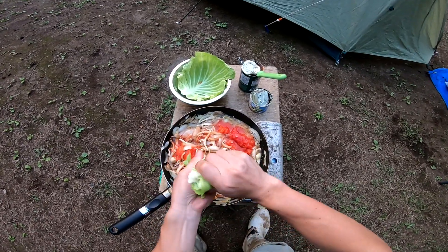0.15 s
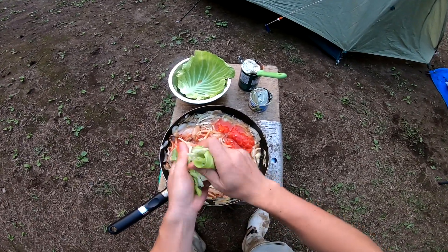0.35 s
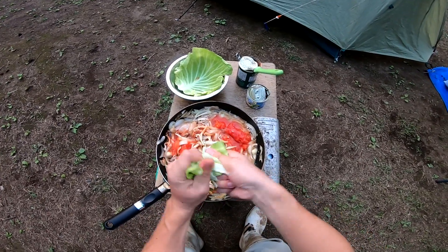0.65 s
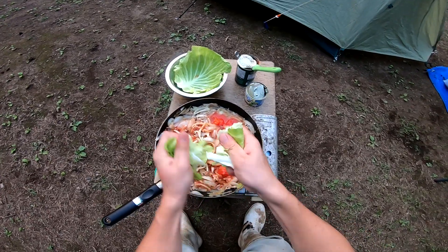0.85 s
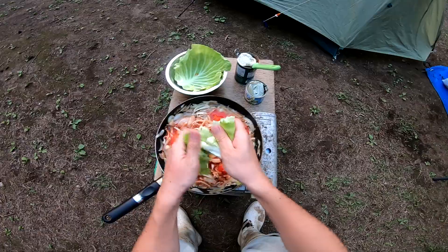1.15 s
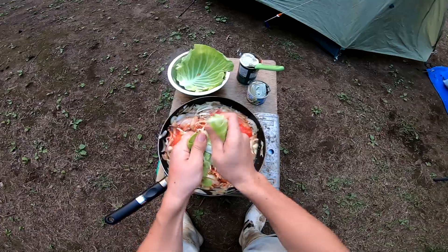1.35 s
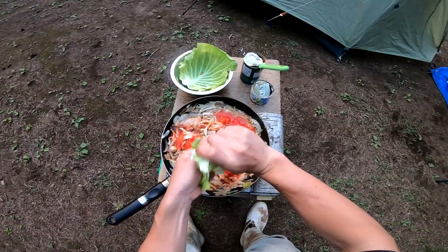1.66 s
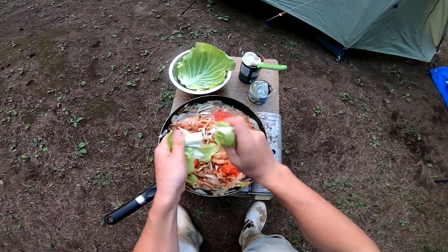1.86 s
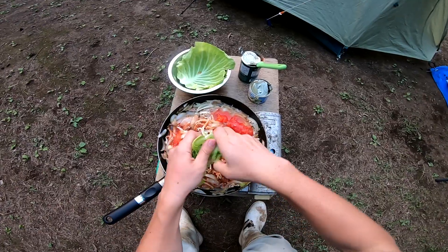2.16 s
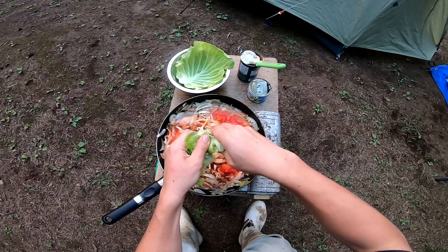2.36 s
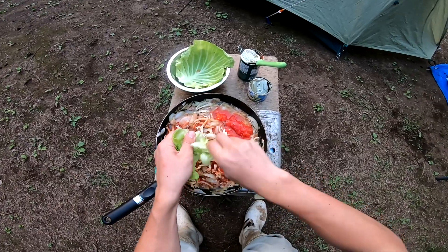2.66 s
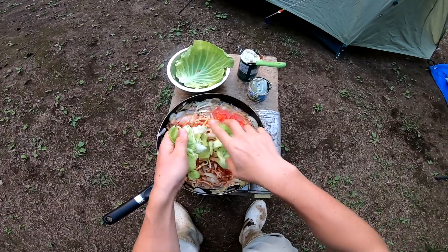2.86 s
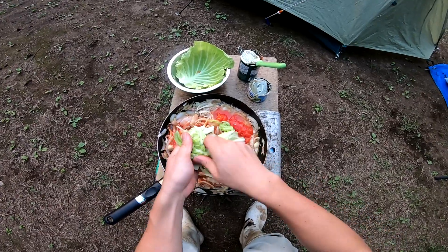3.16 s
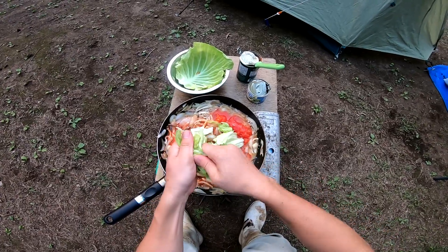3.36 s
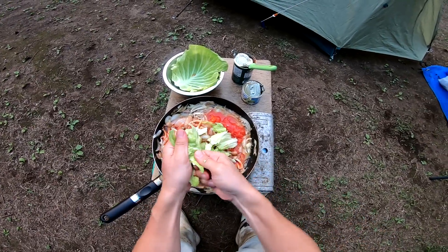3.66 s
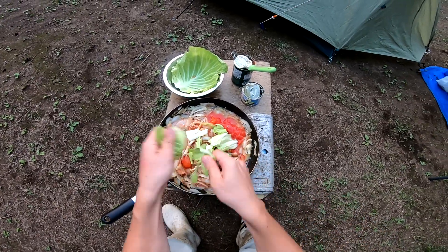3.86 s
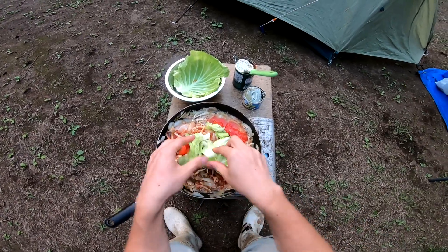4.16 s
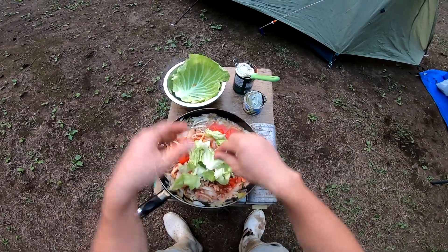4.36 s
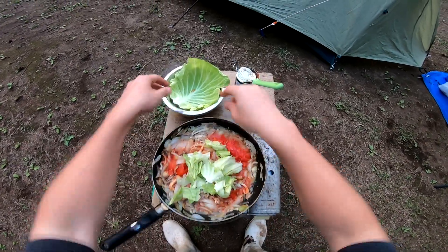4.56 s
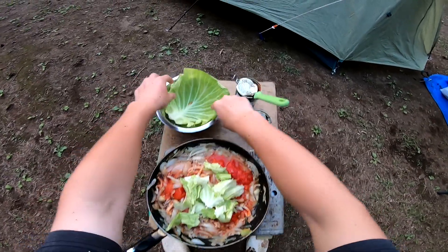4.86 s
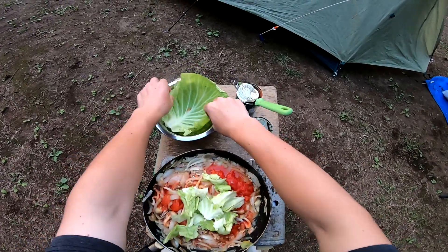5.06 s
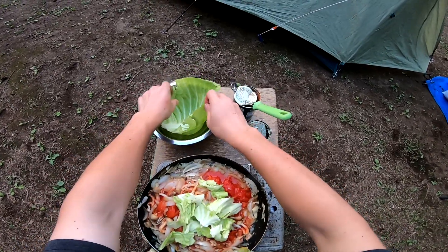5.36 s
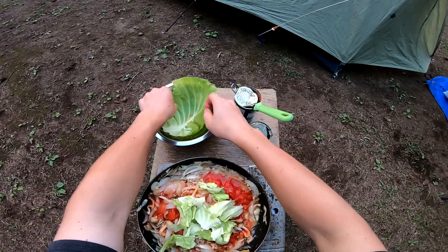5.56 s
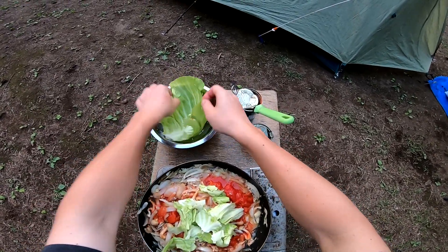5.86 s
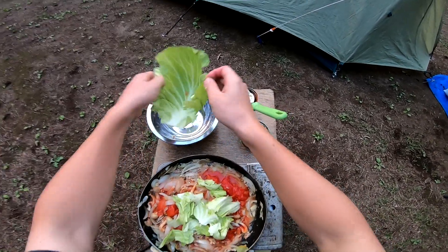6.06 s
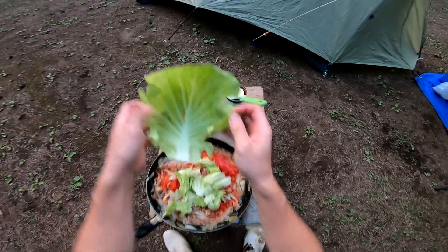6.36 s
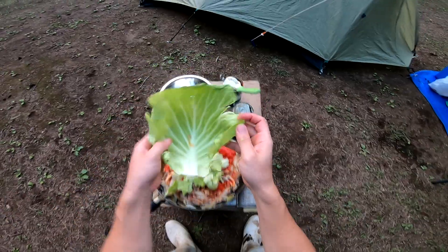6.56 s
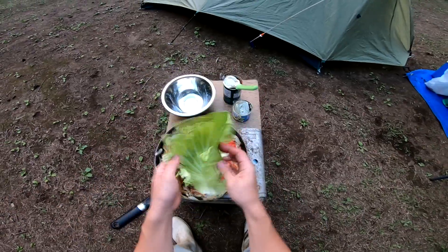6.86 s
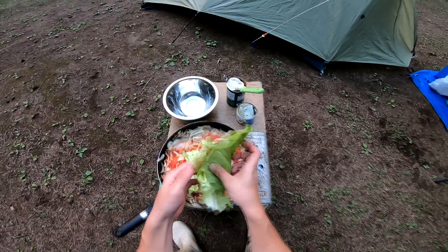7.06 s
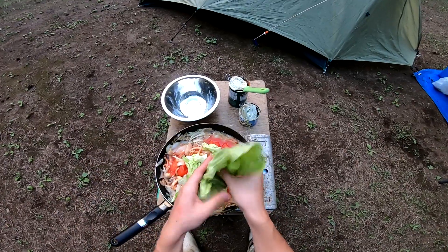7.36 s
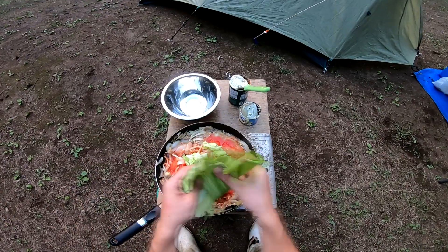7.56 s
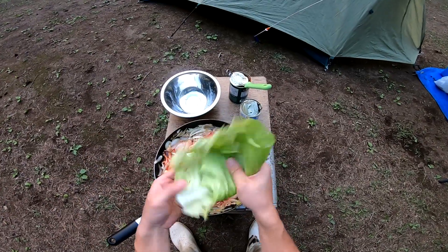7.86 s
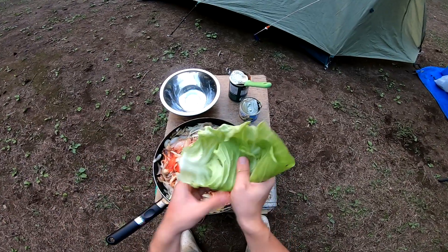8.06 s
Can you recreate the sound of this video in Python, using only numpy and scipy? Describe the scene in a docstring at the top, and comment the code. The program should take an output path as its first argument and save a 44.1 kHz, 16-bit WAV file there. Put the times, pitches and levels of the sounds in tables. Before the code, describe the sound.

Crisp cabbage leaves snap and tear by hand in short bursts over a steady throbbing cicada chorus, then a metal bowl knocks on wood.

```python
"""Leaf ribs snap and fibres crackle as two hands tear cabbage leaves: noise bursts ringing resonances.
Around them cicadas throb, as noise gated by drum clicks, and one cricket chirps, as pulsed narrow-band noise.
A leaf is pulled from a steel bowl that rings and rocks on a wooden board: decaying sine modes under contact noise.
Light wind buffets the microphone ports over a quiet rustle of the woods: slowly varying filtered noise."""
import sys
import numpy as np
from scipy import signal
from scipy.fft import rfft, irfft, next_fast_len
from scipy.io import wavfile
from scipy.ndimage import uniform_filter1d, map_coordinates

SR = 44100
rng = np.random.default_rng(int(sys.argv[2]) if len(sys.argv) > 2 else 0)


def inscribe(sig):
    """Save sig as 16-bit PCM at rate SR to the path in sys.argv[1].

    A 1-D sig is mono; a 2-D sig holds one channel per row.
    Samples are clipped to [-1, 1] before scaling.
    """
    pcm = np.round(np.clip(np.atleast_2d(sig).T, -1, 1) * 32767)
    wavfile.write(sys.argv[1], SR, pcm.astype(np.int16))


N = 362061

# Rib snaps: t/s, peak level/dB, leaf ring f/Hz, hollow of the hands re snap peak/dB
RIB_SNAPS = [(0.0058, -20.5, 3400, -24), (0.0141, -16, 3440, -21), (0.069, -19, 3300, -30),
             (0.079, -17, 3200, -19), (0.096, -19, 1960, -27), (0.127, -13, 3750, -32),
             (0.1556, -15, 4430, -25), (0.164, -12.5, 3140, -32), (0.2171, -23, 2730, -21),
             (0.491, -22, 3560, -23), (0.569, -20, 3450, -19), (0.5784, -10.5, 3200, -20),
             (0.608, -11, 4600, -35), (0.6278, -21, 4350, -23), (0.6514, -23.5, 3500, -14),
             (0.679, -17.5, 4260, -30), (0.695, -17.5, 3100, -20), (0.7027, -17, 4700, -28),
             (0.713, -25, 3300, -12), (0.736, -19, 2700, -29), (1.306, -28.5, 2840, -18),
             (1.3148, -22, 3350, -25), (1.3506, -13.5, 4470, -30), (1.435, -15, 3350, -28),
             (1.464, -24, 3550, -14), (1.48, -24, 3700, -28), (1.497, -30, 3000, -27),
             (1.5287, -5, 3500, -23), (1.564, -18.5, 1600, -32), (1.594, -28.5, 1690, -17),
             (1.6687, -22.5, 3540, -23), (1.7436, -28.5, 1870, -25), (1.7727, -25, 1850, -25),
             (2.357, -18, 3770, -22), (2.367, -23, 3810, -18), (2.3916, -19.5, 3820, -24),
             (2.413, -24, 3640, -25), (2.458, -20, 3730, -33), (2.498, -21, 3750, -26),
             (2.5286, -17.5, 3490, -20), (2.5435, -26, 4220, -15), (2.558, -23, 3300, -16),
             (2.6213, -21.5, 3510, -16.5), (3.2245, -22.5, 3040, -26), (3.2488, -20, 3600, -18),
             (3.2778, -16.5, 3800, -27), (3.2956, -28, 2000, -20), (3.3173, -16, 3300, -29),
             (3.324, -21.5, 2950, -20), (3.4192, -18, 3620, -20), (3.4288, -11.5, 4830, -24),
             (3.474, -19, 3870, -29), (3.503, -31, 2000, -25), (3.5227, -14.5, 3760, -17.5),
             (3.568, -16.5, 3500, -26), (3.588, -20, 4370, -32), (3.6025, -18, 4120, -30),
             (3.606, -26, 3330, -25), (3.67, -30, 2100, -26), (3.69, -24, 4460, -32),
             (3.731, -20, 2970, -30), (3.7373, -13, 4080, -38), (3.7437, -17.5, 2900, -14),
             (5.759, -24.5, 2480, -36), (7.0137, -26, 1130, -8), (7.1915, -26, 2490, -12),
             (7.296, -23.5, 3320, -12), (7.3538, -23, 1040, -9.5), (7.4736, -27.5, 1830, -8.5),
             (7.593, -25.5, 2200, -10), (7.844, -26.5, 1770, -2), (7.8869, -30, 1640, 2),
             (7.907, -19.5, 1770, -9.5), (7.966, -24, 3020, -6), (7.9701, -19, 3160, -12),
             (8.027, -24, 1720, -7.5), (8.116, -27.5, 2870, -24), (8.1405, -29, 1880, -19),
             (8.165, -22.5, 4590, -11.5), (8.1704, -23.5, 1790, -18)]
# Whole leaves buckling: t/s, level/dB, f/Hz
LEAF_POPS = [(2.085, -37.5, 955), (4.99, -44, 2450), (6.165, -40.5, 2190), (6.799, -38, 1010),
             (6.8, -38, 1880), (6.842, -37.5, 910), (7.118, -32.5, 1320), (7.134, -39, 1084),
             (7.172, -35, 1090), (7.57, -37, 1080), (7.632, -34, 880), (7.683, -36, 1050),
             (7.788, -42, 708), (8.057, -39, 1700)]
# Pulls that rip a leaf: t/s, length/s, crackle level/dB
RIP_STROKES = [(0.0, 0.26, -50.5), (.2, 0.23, -55.5), (.42, 0.21, -47.5), (.62, 0.12, -45.5),
               (.73, 0.06, -50.5), (.8, 0.058, -40.5), (1.29, 0.34, -51.5), (1.73, 0.063, -47.5),
               (1.6, 0.13, -59), (2.28, 0.059, -52.5), (2.33, .1, -47.5), (2.43, 0.19, -49.5),
               (3.2, 0.13, -44), (3.16, .63, -54.5), (3.38, 0.054, -46.5), (3.53, 0.091, -46.5),
               (3.68, 0.072, -47), (7.0, 0.36, -59), (7.46, 0.62, -58.5)]
# Leaf sliding through the hands: t/s, length/s, rub level/dB
SLIDE_STROKES = [(.57, 0.058, -57.5), (.8, 0.059, -52.5), (6.96, 0.12, -52.5), (7.1, 0.1, -59),
                 (7.24, 0.08, -53), (7.5, 0.124, -51), (7.6, 0.159, -45.5), (7.74, 0.187, -47),
                 (7.95, 0.22, -52.5)]
# Fibre crackle, common colour: f/Hz, relative level/dB
CRACKLE_SPECTRUM = [(500, -37), (1000, -2.5), (1400, -11.5), (1800, 1.5), (2300, -1), (2900, 5.5),
                    (3600, 6.5), (4200, 7.5), (5500, 2), (7500, 13.5), (10000, 11), (13000, -30)]
# Leaf rubbing on fingers: f/Hz, relative density/dB
RUB_SPECTRUM = [(100, -40), (150, 1.5), (200, 2), (330, -5), (600, -6), (800, 1), (1150, 1), (1400, -6.5),
                (1800, -1.5), (2400, -24.5)]

# Nails on the bowl's rim: t/s, level/dB
RIM_TAPS = [(5.038, -44), (5.357, -44)]
# Steel bowl modes: f/Hz, mean level/dB, t60/s
BOWL_MODES = [(1292, -12, .4), (1350, -6, .4), (1416, -2, .15), (1593, -11, .5), (2073, -10, .6),
              (2444, -4, .55), (2705, -3, .22), (3020, 0, .3), (3644, -8, .1)]
# Bowl's foot on the board: t/s, level/dB
BOARD_KNOCKS = [(5.043, -51), (5.062, -49), (5.162, -44), (5.199, -41.5), (5.343, -34.5), (5.389, -42),
                (5.443, -27), (5.478, -33), (5.499, -41), (5.613, -31), (5.628, -32.5), (5.649, -32.5),
                (5.687, -45)]
# Wooden board modes: f/Hz, mean level/dB, t60/s
BOARD_MODES = [(165, -9, 0.11), (216, 0.5, 0.066), (272.4, -6, 0.14), (434, -13, 0.093), (606, -9, 0.041),
               (990, -15, 0.038)]
# Wet leaf on steel: t/s, length/s, start f/Hz, end f/Hz, peak level/dB
LEAF_SQUEAKS = [(5.137, 0.012, 3800, 3500, -27), (5.149, 0.0065, 3350, 3180, -33),
                (6.312, .008, 3520, 3430, -39)]

# Pumping of cicada bodies, one row: rate/Hz, share of a throb gone at the start
LOW_PUMP = (10.62, 0)
HIGH_PUMP = (10.8, .2)
# Cicada groups: t/s, low level/dB, high level/dB, overtone level/dB, far level/dB
CHORUS_LEVELS = [(0.0, -35.5, -43.5, -63, -55.5), (4.64, -36, -42.5, -62.5, -53),
                 (8.21, -36, -41, -62.5, -54)]
# Cicada songs: f/Hz, relative density/dB
LOW_SPECTRUM = [(3900, -33.5), (4500, -12.5), (5100, -3.5), (5400, -2), (5620, 0.5), (5850, -1.5),
                (6100, -3.5), (6700, -6.5), (7300, -19), (8000, -54)]
HIGH_SPECTRUM = [(5600, -66), (6300, -1.5), (7000, 4), (7700, 1), (8250, -6.5), (8800, -22), (9500, -60)]
OVERTONE_SPECTRUM = [(10500, -26), (12000, -1), (13100, 0), (14500, 4), (15600, -12), (17000, -7)]
FAR_SPECTRUM = [(7800, -33), (8600, 4), (9400, 0), (10200, -4.5), (11600, -5.5), (12500, -7.5),
                (14000, -40)]

# Cricket: t/s, level/dB
CRICKET_LEVEL = [(0, -75), (.9, -61), (2.5, -67), (4.2, -60), (5, -83), (8.21, -80)]
# Cricket voice: f/Hz, relative density/dB
CRICKET_SPECTRUM = [(8800, -60), (9150, -16), (9300, 15), (9450, -6), (9800, -50)]

# Far rustle of the woods: f/Hz, relative density/dB
RUSTLE_SPECTRUM = [(70, -82), (115, -7.5), (220, -5), (280, -4.5), (560, -5.5), (1190, -5), (1740, -8.5),
                   (2400, -5), (3300, -6.5), (4200, 0), (4800, 6.5), (5600, -42)]
# Rustle: t/s, level/dB
RUSTLE_LEVEL = [(0.0, -50), (1.42, -51.5), (8.21, -47.5)]
# Rustle: f/Hz, left-right correlation
RUSTLE_ALIKE = [(130, 0.86), (290, 0.75), (640, 0.5), (1400, 0.05), (3100, 0.59)]
# Rustle: f/Hz, left minus right/dB
RUSTLE_BALANCE = [(200, 1), (700, -2), (1300, -1.5), (2400, 0), (4400, 1.5)]
# Gusts: t/s, rumble level/dB, flutter level/dB
GUST_LEVELS = [(0.0, -57, -73), (0.2, -39.5, -41), (0.48, -62, -80), (0.66, -45.5, -55), (0.78, -59, -76),
               (1.46, -49, -59.5), (1.53, -40, -52), (1.96, -54.5, -66.5), (2.33, -37, -48),
               (2.54, -67, -90), (2.7, -59, -77), (4.21, -61.5, -78), (4.46, -48, -56), (4.64, -54.5, -77),
               (5.33, -72, -79), (5.69, -57, -64), (5.74, -67, -81), (5.97, -44, -55), (6.15, -67, -76),
               (6.29, -44.5, -39.5), (6.49, -56, -72), (6.63, -46, -52.5), (7.18, -60, -82),
               (7.75, -44, -47), (7.82, -59, -73), (8.21, -45.5, -57)]
# Wind noise: f/Hz, relative density/dB
RUMBLE_SPECTRUM = [(8, -24), (22, -3), (42, -4.5), (60, -14.5), (90, -49), (200, -120)]
FLUTTER_SPECTRUM = [(40, -26), (62, -6), (90, -6.5), (140, -15), (220, -21), (400, -49), (900, -120)]

BREAK_S, AFTER_GAIN = 0.0008, 0.09  # rib break: time constant, faint after-crackle
FORE_MEAN_S, FORE_MIN_DB = 0.004, -13  # a fainter copy of the snap, a few ms ahead of it
RISE_SHARE, LET_GO_S = 0.24, 0.01  # a stroke builds up over a share of its length, stops almost at once
LOW_DEPTH_DB, HIGH_DEPTH_DB, OVERTONE_DEPTH_DB = 1.5, 2.2, 3  # mean throb depths
DEPTH_WANDER = 0.4  # share of the throb depth
RUMBLE_LUMP_DB, FLUTTER_LUMP_DB = 2.5, 4.4  # small puffs inside each gust
LIMIT_DB, GRAB_S, RECOVER_DB_PER_S = -9, 0.0024, 180
BAND_LIMIT_HZ = 15750


def amp(db):
    """Gain of a level in dB."""
    return 10 ** (np.asarray(db) / 20)


def unit(x):
    """Scale to rms 1."""
    return x / np.sqrt(np.mean(x ** 2) + 1e-20)


def along(points, hz):
    """Interpolate (Hz, value) points on a log axis."""
    f, v = np.transpose(points)
    return np.interp(np.log(hz + 1), np.log(f + 1), v)


def curves(rows):
    """One value per sample for each column after the time."""
    s, *cols = np.transpose(rows)
    t = np.arange(N) / SR
    return np.array([np.interp(t, s, c) for c in cols])


def wobble(knots_per_s):
    """A smooth curve through random knots."""
    knots = rng.standard_normal(int(N * knots_per_s / SR) + 4)
    return map_coordinates(knots, [np.arange(N) * knots_per_s / SR])


def noise_pair():
    """Two unrelated white noises."""
    return rng.standard_normal((2, N))


def filtered(x, response):
    """Multiply the spectrum of x by a response of frequency."""
    m = next_fast_len(N + 8192)
    return irfft(rfft(x, m) * response(np.fft.rfftfreq(m, 1 / SR)), m)[..., :N]


def spread(pair, spectrum, alike, balance):
    """Two unrelated signals become a coloured stereo pair whose middle has rms 1."""
    def mid_side(hz):
        angle = np.arccos(np.clip(along(alike, hz), -1, 1)) / 2
        return amp(along(spectrum, hz)) * [np.cos(angle), np.sin(angle)]

    def left_right(hz):
        return amp(along(balance, hz) / 2 * np.array([[1], [-1]]))

    mid, side = filtered(pair, mid_side)
    out = filtered(np.array([mid + side, mid - side]), left_right)
    return out / np.std(out.mean(0))


def add(track, s, sound, pan_db):
    """Lay a sound into the stereo track; pan_db is left minus right."""
    part = track[:, round(s * SR):][:, :len(sound)]
    part += amp([[pan_db / 2], [-pan_db / 2]]) * sound[:part.shape[1]]


def peak_normalised(x):
    """Scale to peak 1."""
    return x / np.abs(x).max()


def snaps():
    """A rib's break burst rings the leaf and the hollow of the hands; whole leaves buckle with a pop."""
    track, t = np.zeros((2, N)), np.arange(1024) / SR
    f = np.fft.rfftfreq(len(t), 1 / SR)

    def resonance(centre_hz, width_hz):
        return 1j * f * width_hz / (centre_hz ** 2 - f * f + 1j * f * width_hz)

    body = (0.53 * resonance(4630, 6600) ** 3 + 0.59 * resonance(1800, 520) ** 2
            + 0.11 * resonance(9800, 4400) ** 2)
    # wet tissue radiates little treble
    damp = (resonance(8600, 11100) * 7500 / (1j * f + 1) * 7500 / 11000) ** 2
    hollow = resonance(975, 650) ** 2
    envelope = np.exp(-(t / BREAK_S) ** 2) + AFTER_GAIN * amp(-60 * t / 0.11)

    for s, db, hz, hollow_db in RIB_SNAPS:
        burst = rfft(rng.standard_normal(len(t)) * envelope)
        rib = resonance(hz, 0.2 * hz) * resonance(hz, hz)
        leaf = peak_normalised(irfft(burst * damp * (rib + body)))
        add(track, s, amp(db) * leaf, -2.5)
        fore_s = FORE_MEAN_S * rng.uniform(0.5, 1.5)
        fore_db = FORE_MIN_DB + rng.uniform(0, 3.3)
        add(track, max(s - fore_s, 0), amp(db + fore_db) * leaf, -2.5)
        add(track, s, amp(db + hollow_db) * peak_normalised(irfft(burst * hollow)), -5.5)

    for s, db, hz in LEAF_POPS:
        decay = amp(db - 60 * t / 0.023)
        attack = 1 - np.exp(-t / 0.00033)
        add(track, s, decay * attack * np.sin(2 * np.pi * hz * t), -5)
    return track


def strokes(rows):
    """Summed gain of hand strokes: build up, hold, let go."""
    t = np.arange(N) / SR
    gain = 0
    for s, length_s, db in rows:
        rise = (t - s) / (RISE_SHARE * length_s)
        fall = 1 + (s + length_s - t) / LET_GO_S
        gain = gain + amp(db) * np.clip(np.minimum(rise, fall), 0, 1)
    return gain


def tearing():
    """Small fibres part in clumps, some dull and some bright, and the leaf rubs along the fingers."""
    crackle = 0
    for centre_hz in (1800, 2900, 4200):
        chance = 260 / SR * amp(3 * wobble(40))
        starts = (rng.random(N) < chance) * amp(rng.uniform(-10, 0, N))
        fibres = uniform_filter1d(starts, size=26) * 32 + 0.1  # each lets go within 1 ms
        colour = [(hz, db - 9 * np.log2(hz / centre_hz) ** 2) for hz, db in CRACKLE_SPECTRUM]
        crackle = crackle + spread(fibres * noise_pair(), colour, [(1500, 0.6), (7000, 1.0)], [(1, -2.5)])
    rub_gain = amp(2.6 * wobble(90) + 2 * wobble(25))
    rub = spread(rub_gain * noise_pair(), RUB_SPECTRUM, [(1, 0.5)], [(1, -5)])
    return strokes(RIP_STROKES) * crackle + strokes(SLIDE_STROKES) * rub


def struck(blows, modes, attack_s, contact_gain, dull_s, pan_db):
    """Each blow rings the modes at new strengths, under a short burst of contact noise."""
    track, t = np.zeros((2, N)), np.arange(SR // 2) / SR
    scatter_db = 3
    for s, db in blows:
        ring = 0
        for hz, level_db, t60_s in modes:
            decay = amp(level_db + scatter_db * rng.normal() - 60 * t / t60_s)
            ring = ring + decay * np.sin(2 * np.pi * hz * t)
        # averaging over dull_s softens the contact
        noise = unit(uniform_filter1d(rng.standard_normal(len(t)), max(round(dull_s * SR), 1)))
        contact = contact_gain * noise * amp(-60 * t / 0.033)
        add(track, s, amp(db) * (ring + contact) * (1 - np.exp(-t / attack_s)), pan_db)
    return track


def bowl():
    """Nails tap the steel, its foot knocks the board, the wet leaf squeaks along the rim in sine glides."""
    track = struck(RIM_TAPS, BOWL_MODES, 0.00045, 1.7, 0.000085, -1.5)
    track += struck(BOARD_KNOCKS, BOARD_MODES, 0.0027, 0.5, 0.00024, -1.1)
    for s, length_s, from_hz, to_hz, db in LEAF_SQUEAKS:
        hz = np.linspace(from_hz, to_hz, round(length_s * SR))
        glide = np.sin(2 * np.pi * np.cumsum(hz) / SR)
        add(track, s, amp(db) * np.sqrt(np.hanning(len(hz))) * glide, -1.5)
    return track


def singers(song, level_db, throb, depth_db, click_hz, drift_hz, click_share, alike, pan_db, flutter_db):
    """Drum clicks at a near-steady rate stand out of a blur of insects, most at the height of each throb."""
    rate_hz, start = throb
    pump = np.cos(2 * np.pi * (start + rate_hz * np.arange(N) / SR))
    cycle = np.cumsum(click_hz + drift_hz * wobble(1.5)) / SR % 1
    clicks = unit(np.exp(-1.8 * cycle))
    share = np.clip(click_share * (1 + 0.51 * pump), 0, 1)
    gate = np.sqrt(1 - share + share * clicks ** 2)
    sound = spread(gate * noise_pair(), song, [(1, alike)], [(1, pan_db)])
    throb_db = depth_db * (1 + DEPTH_WANDER * wobble(2.52)) * pump
    side_flutter_db = flutter_db * np.array([wobble(25), wobble(25)])
    return amp(level_db + throb_db + side_flutter_db) * sound


def cicadas():
    """Two near groups, the higher with a band of overtones, and a far group blurred to a hiss."""
    low_db, high_db, overtone_db, far_db = curves(CHORUS_LEVELS)
    far = spread(noise_pair(), FAR_SPECTRUM, [(1, 0.034)], [(8500, 0.5), (12000, 4.2)])
    low = singers(LOW_SPECTRUM, low_db, LOW_PUMP, LOW_DEPTH_DB, click_hz=309, drift_hz=3.2,
                  click_share=0.29, alike=0.27, pan_db=-6.0, flutter_db=0.7)
    high = singers(HIGH_SPECTRUM, high_db, HIGH_PUMP, HIGH_DEPTH_DB, click_hz=326, drift_hz=1.2,
                   click_share=0.36, alike=0.03, pan_db=-2.1, flutter_db=0.81)
    overtones = singers(OVERTONE_SPECTRUM, overtone_db, HIGH_PUMP, OVERTONE_DEPTH_DB, click_hz=320,
                        drift_hz=7.7, click_share=0.4, alike=0.05, pan_db=1.7, flutter_db=0.6)
    return low + high + overtones + amp(far_db + 0.73 * wobble(10)) * far


def cricket():
    """A small insect near by chirps in short, even pulses of narrow-band noise."""
    t = np.arange(N) / SR
    pulse = np.clip(np.cos(2 * np.pi * 13.9 * (t - 1.03)), 0, 1) ** 2
    voice = spread(noise_pair(), CRICKET_SPECTRUM, [(1, 0.6)], [(1, -1.4)])
    return amp(curves(CRICKET_LEVEL)[0]) * unit(pulse) * voice


def air():
    """The woods rustle as broad noise; gusts shake each microphone port almost on its own, as low noise."""
    rustle_gain = amp(curves(RUSTLE_LEVEL)[0] + 0.98 * wobble(7.4))
    rustle = rustle_gain * spread(noise_pair(), RUSTLE_SPECTRUM, RUSTLE_ALIKE, RUSTLE_BALANCE)
    rumble_db, flutter_db = curves(GUST_LEVELS)
    lumps = np.array([wobble(9.8), wobble(4.5)])
    rumble = spread(amp(RUMBLE_LUMP_DB * lumps) * noise_pair(), RUMBLE_SPECTRUM, [(1, 0.095)], [(1, -3.0)])
    flutter = spread(amp(FLUTTER_LUMP_DB * lumps) * noise_pair(), FLUTTER_SPECTRUM,
                     [(1, 0.072)], [(1, -4.5)])
    return rustle + amp(rumble_db) * rumble + amp(flutter_db) * flutter


def scene():
    """Sum of all sources."""
    return snaps() + tearing() + bowl() + cicadas() + cricket() + air()


def record(dry):
    """A limiter ducks both channels after any peak over its limit; a low-pass cuts all above the band limit."""
    slope_db = RECOVER_DB_PER_S * np.arange(N) / SR
    peak_db = 20 * np.log10(np.abs(dry).max(0) + 1e-9)
    over_db = np.clip(peak_db - LIMIT_DB, 0, None)
    duck_db = np.maximum.accumulate(over_db + slope_db) - slope_db  # linear recovery in dB
    lag = np.exp(-1 / (GRAB_S * SR))
    smooth_duck_db = signal.lfilter([1 - lag], [1, -lag], duck_db)
    return filtered(dry * amp(-smooth_duck_db), lambda hz: hz < BAND_LIMIT_HZ)


dry = scene()
out = record(dry)
inscribe(out)
```